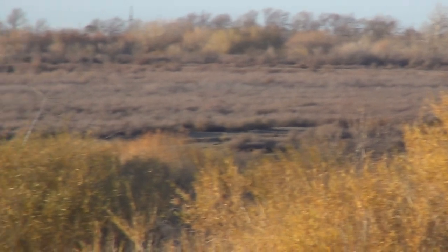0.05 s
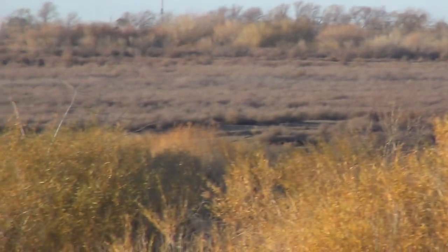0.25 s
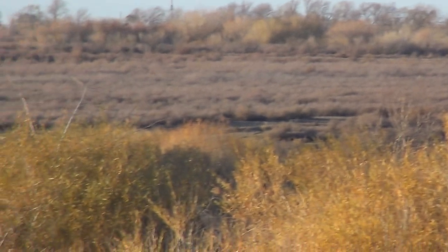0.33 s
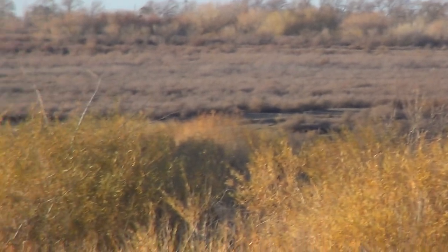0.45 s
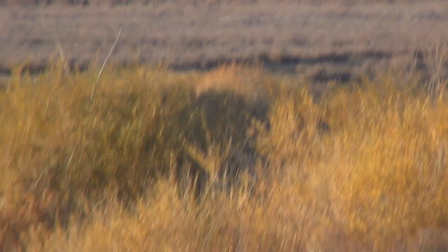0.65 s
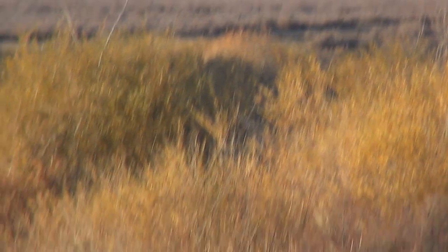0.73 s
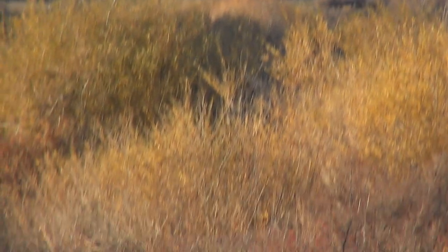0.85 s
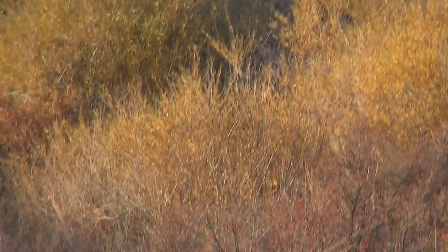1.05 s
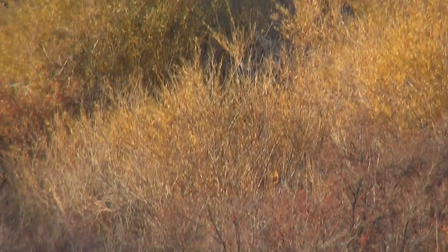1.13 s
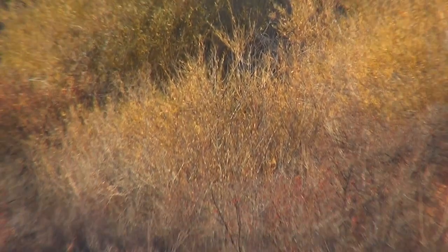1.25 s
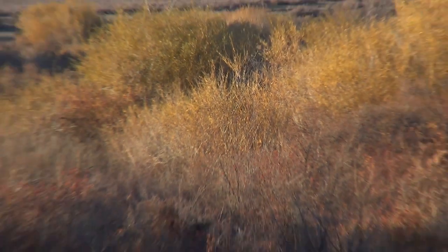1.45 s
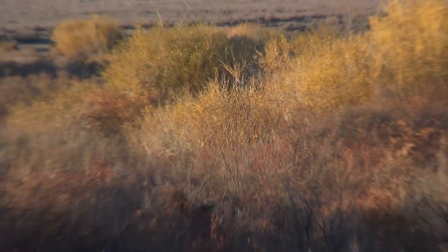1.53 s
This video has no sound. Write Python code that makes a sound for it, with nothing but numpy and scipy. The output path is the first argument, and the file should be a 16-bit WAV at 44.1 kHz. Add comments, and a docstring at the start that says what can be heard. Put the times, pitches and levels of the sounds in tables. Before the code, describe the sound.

Two gunshots in quick succession echo across open land, with faint wind on the microphone.

```python
"""Two gunshots over an open marsh, 0.65 s apart, heard from a close microphone pair in a bank of bushes.
Each sharp report and its bounce off the ground is followed by a swelling rush scattered by the brush,
short pitched knocks, slaps from thickets and a long roll from the far plain.
A twig ticks nearby, something peeps faintly far off, and light wind rumbles on the microphone."""
import sys
import numpy as np
from scipy import signal
from scipy.fft import rfft, irfft
from scipy.io import wavfile

SR = 44100
rng = np.random.default_rng(int(sys.argv[2]) if len(sys.argv) > 2 else 0)


def store_wav(level_fs):
    """Save 16-bit WAV to argv[1]."""
    pcm = np.round(np.clip(np.atleast_2d(level_fs), -1, 1) * 32767)
    wavfile.write(sys.argv[1], SR, pcm.T.astype(np.int16))


N = 70560
T = np.arange(N) / SR
FFT_SIZE = 81920
HZ = np.maximum(np.arange(FFT_SIZE // 2 + 1) * SR / FFT_SIZE, 1)


# The shots as they reach the bushes; levels are relative trims:
# start_s, report_db, thump_db, echoes_db, bounce_lag_s, bounce_db, left_minus_right_db
SHOTS = [(0.2098, -5.5, -31, 0, 0.00233, -2.5, 1), (.8594, -1, -38.5, -1.5, 0.00245, -7.5, 1.13)]
def gunshots(thicket_echoes, report_gain_db=5):
    """Each shot brings a report, a low push of air and the answer of the marsh."""
    out = 0
    for at, report_db, thump_db, echoes_db, lag, bounce_db, pan_db in SHOTS:
        direct = undb(report_gain_db + report_db) * report(at, lag, bounce_db) + undb(thump_db) * thump(at)
        slaps = np.pad(thicket_echoes, ((0, 0), (int(at * SR), 0)))[:, :N]
        echoes = lead_in(at) + brush_scatter(at) + far_roll(at) + slaps
        pan = undb(np.array([[pan_db], [-pan_db]]) / 2)
        out = out + (direct + undb(echoes_db) * echoes) * pan
    return out


# Colour of the blast from across the marsh: frequency_hz, level_db
REPORT_COLOUR = [(25, -30), (100, -39.5), (300, -3), (600, 1.5), (1050, 4), (1500, -6), (2600, -4),
                 (4100, -11), (5200, -21.5), (8500, -28), (12000, -42), (16000, -48)]
def report(at, lag, bounce_db, ground_hz=2400, smear_hz=900, smear_q=0.89):
    """The direct blast and its duller bounce off the ground; the way through the grass smears both."""
    tone = spectrum(REPORT_COLOUR)
    bounce = undb(bounce_db) * colour(pulse(at + lag), tone * lowpass(ground_hz))
    blast = bounce - colour(pulse(at), tone)
    return blast - 2 * signal.lfilter(*signal.iirpeak(smear_hz, smear_q, fs=SR), blast)  # all-pass


def thump(at, width_s=0.0012, early_s=0.0025):
    """The low push of air with a report: one slow swing of pressure, down and then up."""
    swing = (T - at + early_s) / width_s
    return swing * np.exp((1 - swing ** 2) / 2)


def lead_in(at, length_s=0.016, start_db=-47.5, rise_db=15.5, top_hz=4000):
    """A faint dull rush grows for a moment before the report."""
    age = T - at + length_s
    swell = undb(start_db + rise_db * np.clip(age / length_s, 0, 1)) * (age > 0) * (T < at)
    return swell * colour(diffuse(), spectrum(BRUSH_COLOUR) * lowpass(top_hz) ** 2)


# Swell of the scatter from the brush around the microphone: after_shot_s, level_db
BRUSH_SWELL = [(-.004, -15), (.002, 2), (.025, -0.5), (.062, 3), (.078, -2), (.092, 5), (.124, 6.5),
               (.142, 4), (.165, -2), (.195, -10), (.225, -5), (.25, -21), (.31, -8), (.36, -48), (.8, -54)]
# Colour of that scatter: frequency_hz, level_db
BRUSH_COLOUR = [(60, -38), (120, -16.5), (260, -21), (420, -14), (600, 0), (730, -3), (860, -19), (1000, 1),
                (1140, 2.5), (1320, -7.5), (1530, -1), (2040, -8), (3400, -9.5), (4300, -11.5), (5500, -18),
                (8100, -21.5), (11000, -38), (16000, -75)]
def brush_scatter(at, gain_db=-31, air_db_per_khz_s=9, grain_db=1, grains_per_s=450):
    """Countless reflections from reeds and bushes; the later they come, the more treble the air takes."""
    age = T - at
    grain = undb(grain_db * np.interp(T, np.arange(2000) / grains_per_s, rng.standard_normal(2000)))
    rush = colour(diffuse() * grain / np.sqrt(np.mean(grain ** 2)), spectrum(BRUSH_COLOUR))
    bins = rfft(rush, FFT_SIZE)
    centres_hz = 500 * 2 ** (np.arange(11) / 2)  # half-octave bands
    out = 0
    for hz, weights in zip(centres_hz, np.eye(len(centres_hz))):
        band = irfft(bins * np.interp(HZ, centres_hz, weights))[:, :N]
        out = out + band * undb(-air_db_per_khz_s * hz / 1000 * np.maximum(age, 0))
    return out * envelope(BRUSH_SWELL, age) * (age > BRUSH_SWELL[0][0]) * undb(gain_db)


# Ringing arrivals at the microphone, each belonging to one shot only:
# start_s, level_db, spacing_s, length_s, centre_hz, width_hz
FLUTTERS = [(0.2048, -7, .00105, 0.0021, 770, 1430), (.3101, 0.5, .00085, 0.0043, 1210, 1300),
            (0.3321, -2.5, 0.002126, 0.0053, 560, 900), (0.343, 3.5, .00068, 0.0056, 1490, 700),
            (0.859, -28, 0.00042, 0.00082, 600, 1220), (0.91, -5.5, 0.000553, 0.0032, 1510, 1200),
            (0.9968, 4, 0.0021, 0.0061, 620, 900)]
def flutters(gain_db=1.5, low_hz=300, top_hz=3650, jitter=0.12):
    """A few nearly evenly spaced wavefronts make a short pitched knock."""
    out = 0
    for at, db, spacing, length, hz, width in FLUTTERS:
        lags = np.arange(0, length, spacing)
        slips = jitter * spacing * rng.standard_normal(size=32)
        heights = np.sqrt(1 - (lags / length) ** 2)
        fronts = sum(height * pulse(at + lag + slip) for height, lag, slip in zip(heights, lags, slips))
        knock = colour(fronts, resonance(hz, width) * lowpass(top_hz) * highpass(low_hz))
        out = out - undb(db + gain_db) * knock / np.sqrt(np.sum(knock ** 2))
    return out


# Slaps from thickets, nearest first: after_shot_s, level_db, spread_s, bass_cut_hz, treble_cut_hz
THICKETS = [(0.051, -11, .0015, 600, 4000), (.0675, -3.5, 0.0022, 405, 2980),
            (0.1212, -7.5, 0.00074, 400, 4070), (0.1567, -8.5, 0.0057, 445, 2000),
            (0.2213, -9, 0.0043, 400, 1500), (0.3038, -17, 0.003, 900, 1220),
            (0.314, -35, 0.0026, 900, 1500), (.436, -25.5, 0.011, 450, 1500), (0.493, -26, .007, 704, 1100),
            (0.614, -25, 0.0067, 1000, 900), (.666, -24.5, 0.0037, 450, 900)]
# Colour the slaps share: frequency_hz, level_db
SLAP_COLOUR = [(100, -43), (330, -21), (520, 1.5), (680, -3), (840, -8.5), (1060, 4), (1350, -9),
               (2500, -11.5), (4200, -15), (8000, -32), (16000, -68)]
def thicket_slaps(gain_db=4.5, rise_share=0.71):
    """Each thicket returns a smeared, dull copy of a shot at time zero; small ones return less bass."""
    out = 0
    for delay, db, spread, low_hz, top_hz in THICKETS:
        tone = spectrum(SLAP_COLOUR) * lowpass(top_hz) * highpass(low_hz)
        out = out + undb(db + gain_db) * burst(delay, rise_share * spread, spread, tone)
    return out


# Colour of the roll from far out on the plain: frequency_hz, level_db
ROLL_COLOUR = [(60, -27.5), (150, -10.5), (320, -10), (520, -2), (800, -3.5), (1030, 4), (1350, -4.5),
               (2000, -5.5), (3000, -9.5), (4200, -16), (6000, -25.5), (9000, -40), (16000, -73)]
def far_roll(at, gain_db=-38.5, rise_s=0.22, fade_db_per_s=31.5):
    """The far plain answers with a long even fade."""
    age = np.maximum(T - at, 0)
    level = np.minimum(age / rise_s, 1) * undb(gain_db - fade_db_per_s * age)
    return colour(diffuse(), spectrum(ROLL_COLOUR)) * level


# A twig close to the microphone: peak_s, level_db, decay_s
TWIG_TICKS = [(1.2148, -15, 0.0013), (1.455, -41, 0.0015)]
# Colour of its tick: frequency_hz, level_db
TWIG_COLOUR = [(200, -35), (1080, 5), (2200, -1.5), (4500, -10), (5450, -5), (6300, -14.5), (8100, -8),
               (10200, -19.5), (16000, -19)]
def twig():
    """Dry ticks, each a tiny burst of bright noise."""
    return sum(undb(db) * burst(at, decay / 10, decay, spectrum(TWIG_COLOUR))
               for at, db, decay in TWIG_TICKS)


# A distant peep before the first shot: time_s, pitch_hz, level_db
PEEP_CONTOUR = [(.046, 1700, -81), (0.053, 2030, -71), (.057, 2320, -60), (.062, 1780, -67),
                (0.068, 1510, -63), (.074, 1400, -85)]
def peep(roughness_rad=0.99, roughness_hz=360, upper_ratio=1.6, upper_db=-8):
    """A faint hoarse peep of two arching tones, perhaps a small bird."""
    times, hz, db = np.array(PEEP_CONTOUR).T
    phase = 2 * np.pi * np.cumsum(np.interp(T, times, hz)) / SR
    phase += roughness_rad * colour(rng.standard_normal(N), lowpass(roughness_hz))
    tones = np.sin(phase) + undb(upper_db) * np.sin(upper_ratio * phase)
    return tones * np.interp(T, times, undb(db), 0, 0)


# Gusts right on the microphone: time_s, level_db
GUSTS = [(0, -41), (.15, -52), (.185, -55.5), (.43, -67), (.52, -49.5), (.62, -61.5), (.8, -65.5),
         (.9, -53.5), (1.19, -64.5), (1.32, -61), (1.38, -55.5), (1.43, -62), (1.5, -64), (1.6, -64.5)]
# Colour of their rumble: frequency_hz, level_db
WIND_COLOUR = [(20, -32), (45, -17.5), (80, 0), (130, 0), (190, 0), (280, -7), (400, -9.5), (550, -24.5),
               (1500, -46), (4000, -66), (16000, -95)]
# Still air over the plain: frequency_hz, level_db
HUSH_COLOUR = [(30, -8.5), (300, -5.5), (600, 2.5), (900, 0.5), (1120, 3.5), (1350, -7.5), (2000, -13),
               (3500, -18.5), (8000, -20), (16000, -21)]
def wind(hush_db=-66):
    """Soft gusts rumble over a faint steady hush."""
    rumble = colour(diffuse(), spectrum(WIND_COLOUR)) * envelope(GUSTS, T)
    return rumble + undb(hush_db) * colour(diffuse(), spectrum(HUSH_COLOUR))


def undb(db):
    """Decibels to gain."""
    return 10 ** (np.asarray(db) / 20)


def envelope(rows, t):
    """Gain over time from (time_s, level_db) points."""
    return undb(np.interp(t, *np.array(rows).T))


def spectrum(rows):
    """Gain at every frequency from (frequency_hz, level_db) points."""
    hz, db = np.array(rows, float).T
    return undb(np.interp(np.log(HZ), np.log(hz), db))


def lowpass(hz):
    """Gain of a two-pole treble cut."""
    return 1 / np.sqrt(1 + (HZ / hz) ** 4)


def highpass(hz):
    """Gain of a two-pole bass cut."""
    return lowpass(hz) * (HZ / hz) ** 2


def resonance(hz, width_hz):
    """Gain of a resonance applied twice."""
    return 1 / (1 + ((HZ / hz - hz / HZ) * hz / width_hz) ** 2)


def colour(x, gain):
    """Causal filter with this gain, scaled to keep the power of white noise."""
    gain = gain / np.sqrt(np.mean(gain ** 2))
    cepstrum = irfft(np.log(gain + 1e-5))
    cepstrum[1:FFT_SIZE // 2] *= 2  # fold to minimum phase
    cepstrum[FFT_SIZE // 2 + 1:] = 0
    return irfft(rfft(x, FFT_SIZE) * np.exp(rfft(cepstrum)))[..., :N]


def pulse(at):
    """One wavefront."""
    return 1. * (np.arange(N) == int(at * SR))


def diffuse(side_db=-18.5):
    """Noise from all around, nearly alike at the two close capsules."""
    mid, side = rng.standard_normal((2, N))
    return mid + undb(side_db) * side * np.array([[1], [-1]])


def burst(at, rise_s, decay_s, gain):
    """A coloured cluster of arrivals that swells and dies away; mean energy 1 per channel."""
    swell = np.exp(-np.maximum((at - T) / rise_s, (T - at) / decay_s))
    cluster = colour(diffuse() * swell, gain)
    return cluster / np.sqrt(np.sum(cluster ** 2) / 2)


def scene():
    """Both shots with their echoes, in the light wind."""
    return wind() + twig() + peep() + flutters() + gunshots(thicket_slaps())


# Balance of the microphone pair: frequency_hz, left_minus_right_db
CAPSULE_BALANCE = [(60, -1.5), (170, 3.8), (290, 1.6), (400, -3.5), (520, -1.5), (720, 3), (1050, 1.5),
                   (2300, 3.5), (3700, -1.5), (5400, 0), (7100, -5.5), (9500, -0.5), (15000, 0)]
# Phase of the left capsule against the right: frequency_hz, lead_rad
CAPSULE_PHASE = [(4700, 0.089), (6400, -0.84), (7600, 0.3)]
def record(dry, top_hz=17500):
    """The two capsules differ a little in colour and phase; the top is cut."""
    lead_rad = np.interp(HZ, *np.array(CAPSULE_PHASE).T)
    left = np.sqrt(spectrum(CAPSULE_BALANCE)) * np.exp(.5j * lead_rad)
    heard = irfft(rfft(dry, FFT_SIZE) * np.array([left, 1 / left]))[:, :N]
    return signal.sosfilt(signal.ellip(8, .2, 70, top_hz, fs=SR, output="sos"), heard)


dry = scene()
out = record(dry)
store_wav(out)
```